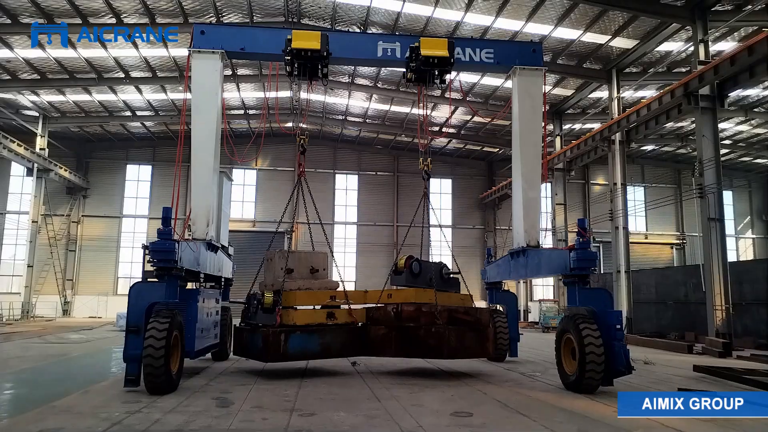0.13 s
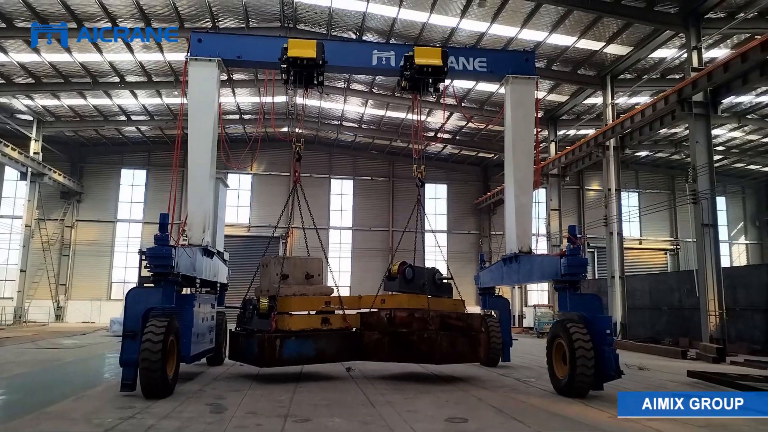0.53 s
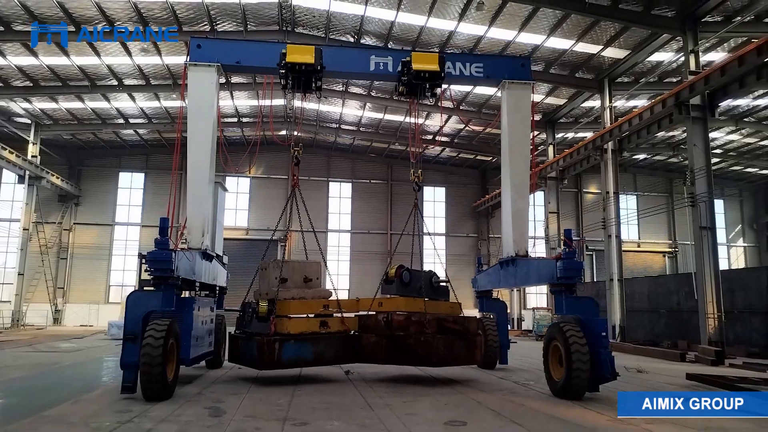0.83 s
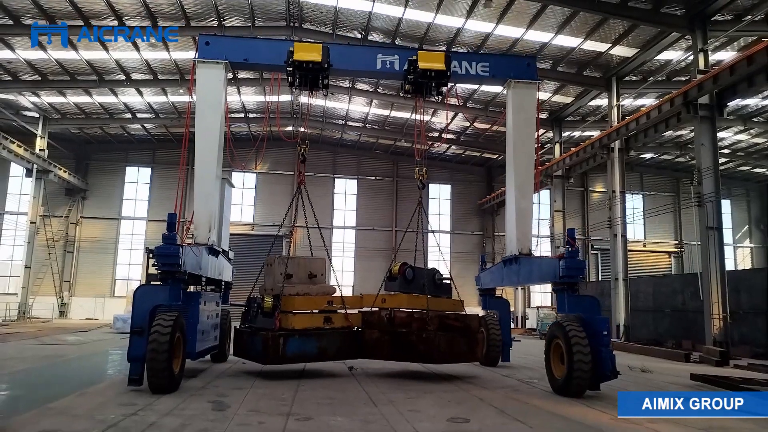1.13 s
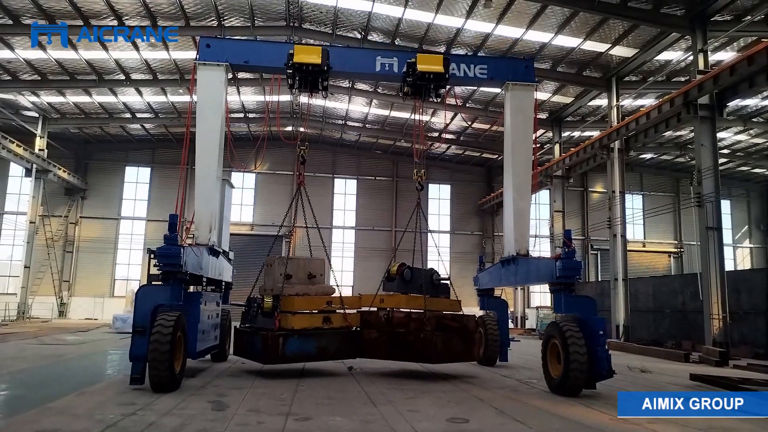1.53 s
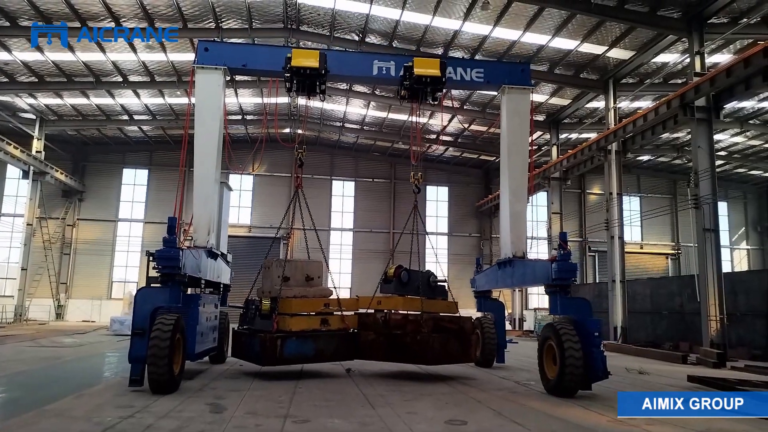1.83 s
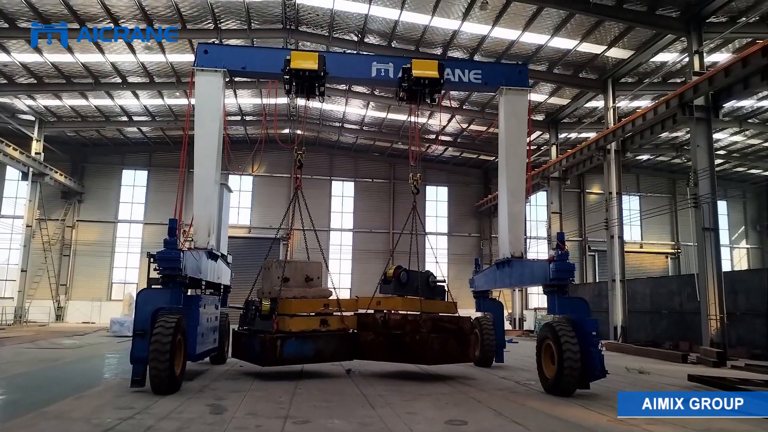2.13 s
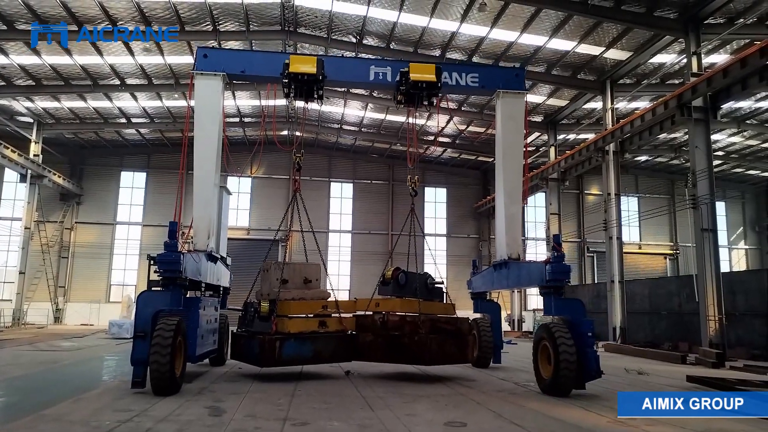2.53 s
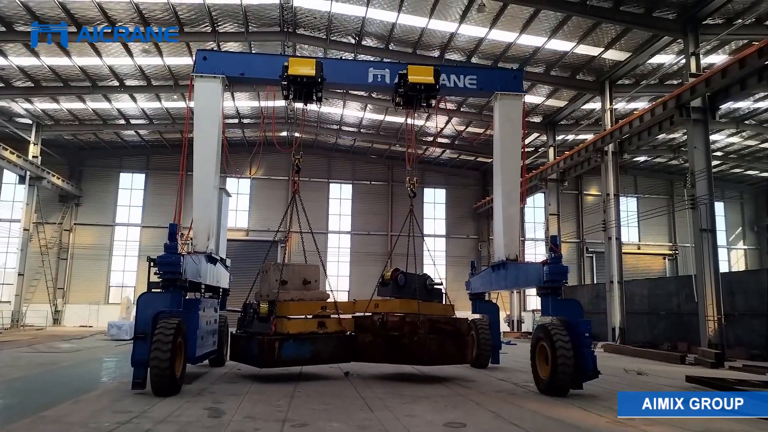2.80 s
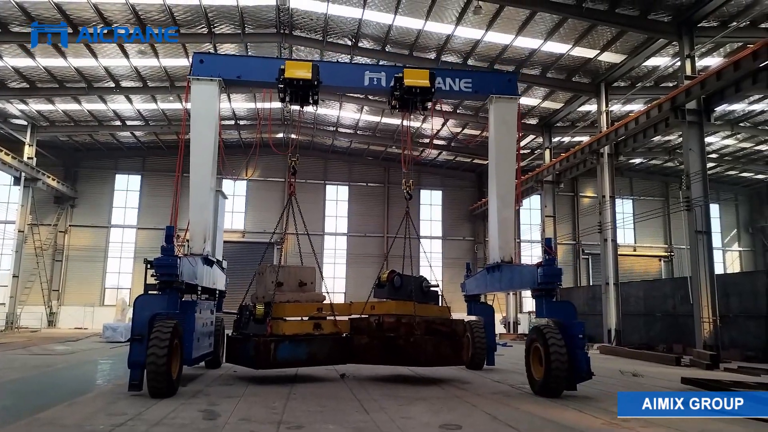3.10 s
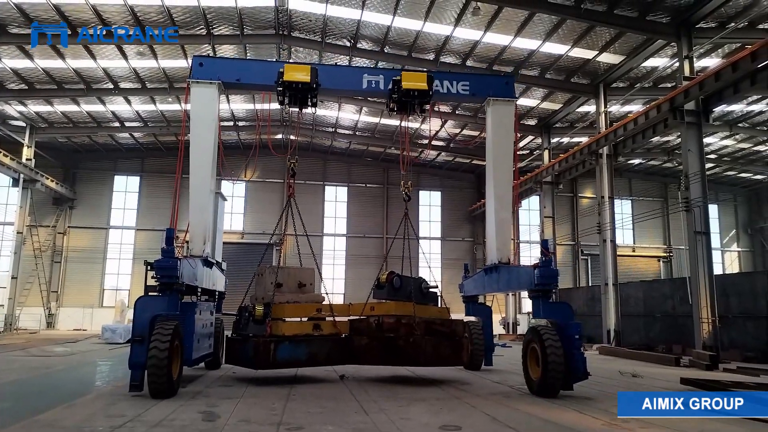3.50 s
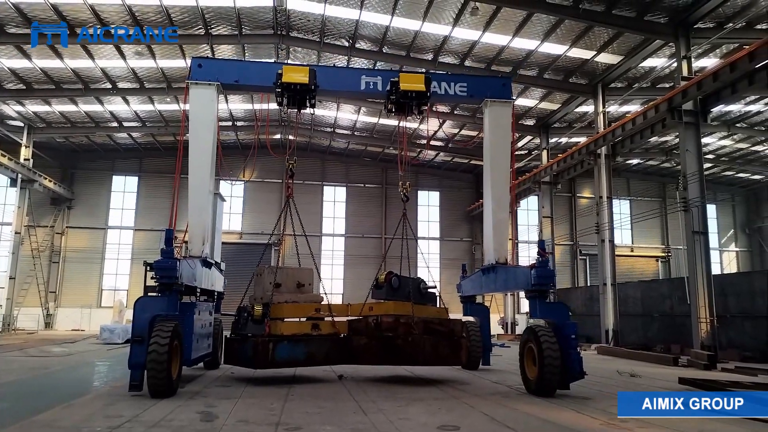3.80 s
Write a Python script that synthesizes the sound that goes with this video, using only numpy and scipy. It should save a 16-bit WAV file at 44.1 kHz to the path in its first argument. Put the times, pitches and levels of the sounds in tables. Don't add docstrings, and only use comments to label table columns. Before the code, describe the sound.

A wheeled gantry crane's diesel engine drones steadily in a large factory hall, with a swelling low hum, broad roar and thin high whine; faint metallic knocks come late; phone microphone in stereo.

```python
import sys
import numpy as np
from scipy import signal
from scipy.fft import rfft, irfft
from scipy.io import wavfile
from scipy.ndimage import uniform_filter1d

SR = 44100
rng = np.random.default_rng(int(sys.argv[2]) if len(sys.argv) > 2 else 0)


def store_wav(level_fs):
    pcm = np.round(np.clip(np.atleast_2d(level_fs), -1, 1) * 32767)
    wavfile.write(sys.argv[1], SR, pcm.T.astype(np.int16))


def how_loud(loudness_db):
    steps = np.asarray(loudness_db, float) / 20
    return 10 ** steps


N = 174195
START_S = 0.11


def evened(x):
    return x / np.sqrt(np.mean(abs(x) ** 2) + 1e-20)


def read(points, hz):
    f, value = np.transpose(points)
    return np.interp(np.log(hz + 1), np.log(f + 1), value)


def drift(top_hz):
    t = np.arange(0, N + 64, 64) / SR
    slow = 0
    for f in np.geomspace(.3, top_hz, num=12):
        slow = slow + np.sin(2 * np.pi * (f * t + rng.random())) / np.sqrt(f)
    return np.interp(np.arange(N) / SR, t, evened(slow))


def fuzz(hz, width_hz):
    r = np.exp(-np.pi * width_hz / SR)
    noise = rng.standard_normal(N) + 1j * rng.standard_normal(N)
    slow = signal.lfilter([1], [1, -2 * r, r * r], noise)
    carrier = np.exp(2j * np.pi * hz * np.arange(N) / SR)
    return evened((slow * carrier).real)


def wash(spectrum, swell_db, patch_db, flicker_db):
    frames = N // 256 + 5
    a, b, c, d, patches = rng.standard_normal((frames, 513, 5)).T
    patches = uniform_filter1d(patches, size=14, axis=0)
    patches = evened(uniform_filter1d(patches, size=16, axis=1))
    swell = drift(2.1)[np.minimum(np.arange(frames) * 256, N - 1)]
    flicker = evened(uniform_filter1d(rng.standard_normal(frames), size=3))
    level_db = patch_db * patches + swell_db * swell + flicker_db * flicker
    z = np.array([a + 1j * b, c + 1j * d]) * how_loud(level_db)
    x = signal.istft(z, nperseg=1024, noverlap=768)[1][:, :N]
    colour = how_loud(read(spectrum, np.fft.rfftfreq(N, 1 / SR)))
    return evened(irfft(rfft(x) * colour, N))


def casing_rumble():
    # (frequency [Hz], density [dB per Hz])
    rumble_colour = [(20, -57.5), (55, -40.5), (85, -10), (125, -1.5), (185, -7), (220, -7), (260, -11.5),
                     (400, -34.5)]
    return how_loud(-26) * wash(rumble_colour, 0.91, 1., 1.0)


def machinery_roar():
    # (frequency [Hz], density [dB per Hz])
    roar_colour = [(150, -8.5), (400, -1), (900, -3), (2000, -5), (2600, -8), (4800, -16.5), (6200, -12.5),
                   (16000, -17)]
    return how_loud(-19.5) * wash(roar_colour, 0.16, 0.93, 0.65)


def knocks():
    # (time [s], level [dB])
    blows = [
        (2.371, -36),
        (2.559, -36.5),
        (2.834, -29),
    ]
    # (frequency [Hz], level [dB], time to fall 60 dB [s])
    metal_modes = [(5290, 0, .3), (5750, -5, .2), (6700, -6, .2), (8500, 2, .45), (9800, -2, .3),
                   (11100, -4, .3), (13100, 3, .7)]
    rings = [(fuzz(hz, 90.), db, t60) for hz, db, t60 in metal_modes]
    puff_band = signal.butter(2, (4400, 12400), "band", fs=SR, output="sos")
    puff = evened(signal.sosfilt(puff_band, rng.standard_normal(N)))
    rings.append((puff, 8, .5))
    out = 0
    for start_s, blow_db in blows:
        t = np.maximum(np.arange(N) / SR - start_s, 0)
        rise = np.minimum(t / 0.006, 1)
        out = out + rise * sum(how_loud(blow_db + db - 60 * t / t60) * ring for ring, db, t60 in rings)
    return out


def humps_and_whine():
    # (frequency [Hz], width [Hz], level [dB rms])
    roar_humps = [(1165, 320, -27), (1913, 220, -31.5), (5710, 570, -43.5), (440.4, 51, -39.5)]
    # (frequency [Hz]), (width [Hz]), (level [dB rms]), (drift [dB per s])
    whine_hz = (5695, 5986, 6346, 6716)
    whine_width_hz = (24, 30, 45, 70)
    whine_db = (-41, -42, -48, -46)
    whine_db_per_s = (-.9, 0, 1.6, 0)
    peaks = [tuple(row) + (0,) for row in roar_humps]
    peaks += list(zip(whine_hz, whine_width_hz, whine_db, whine_db_per_s))
    t = np.arange(N) / SR
    return sum(how_loud(db + slope * t + 1.8 * drift(4.7)) * fuzz(hz, width_hz)
               for hz, width_hz, db, slope in peaks)


def pump():
    # (time [s], fundamental [dB], second [dB], third [dB])
    standing_waves = [(0, -25, -28, -32), (.5, -21.5, -31, -32), (.8, -19, -31, -33),
                      (1.1, -22.5, -31.5, -27), (1.4, -29.5, -33, -32.5), (1.7, -26.5, -25, -33),
                      (2, -17.5, -36.5, -28), (2.3, -22.5, -26, -31), (2.6, -19.5, -32.5, -32),
                      (2.9, -19.5, -28.5, -34), (3.2, -21.5, -27.5, -29.5), (3.45, -19, -31, -32),
                      (3.7, -20, -28.5, -36), (3.95, -21, -36, -36)]
    # (multiple of the pump frequency [1], level [dB rms], fuzz width [Hz])
    faint_tones = [(4, -41, 14.), (.524, -37, 3.)]
    pump_hz, peak_s = 201.44, .4002
    t = np.arange(N) / SR
    turns = pump_hz * (t - peak_s) + 0.02 * drift(4.)
    times, *harmonics_db = np.transpose(standing_waves)
    hum = 0
    for k, db in enumerate(harmonics_db, 1):
        clean = np.sqrt(2) * np.cos(2 * np.pi * k * turns)
        hum = hum + how_loud(np.interp(t, times, db)) * (clean + .4 * fuzz(k * pump_hz, 14))
    return hum + sum(how_loud(db) * fuzz(k * pump_hz, width_hz) for k, db, width_hz in faint_tones)


def engine():
    # (multiple of the cycle [1], level [dB rms], drift [dB per s])
    pulse_orders = [(6, -30.5, 0.5), (9, -20, -1), (12, -20, -1.5), (13, -32, -2.5), (14, -29, -0.5)]
    # (multiple of the cycle [1], level [dB rms])
    uneven_orders = [(5, -51), (7, -47.5), (8, -49), (10, -39), (15, -30.5), (20, -43), (22, -44),
                     (24, -35), (25, -43), (34, -43.5), (36, -60.5)]
    cycle_hz, firing_s = 12.555, .4302
    pipe_lag = .044
    t = np.arange(N) / SR - firing_s

    def order(k, turn):
        return np.sqrt(2) * np.cos(2 * np.pi * (k * cycle_hz * t + turn))

    out = 0
    for k, db, slope in pulse_orders:
        out = out + how_loud(db + slope * t + 1.6 * drift(8)) * order(k, -pipe_lag * max(k - 9, 0))
    for k, db in uneven_orders:
        out = out + how_loud(db + 1.73 * drift(3.14)) * order(k, rng.random())
    return out


def fade(seconds):
    t = np.arange(N) / SR - START_S
    return (t > 0) * how_loud(-17 * np.exp(-np.maximum(t, 0) * 2 / seconds))


def two_ports(tones, diffuse):
    # (frequency [Hz], gain [dB])
    left_colour = [(700, 1.03), (1200, 0), (4500, -3), (5800, -3.5), (6800, 1.5), (8400, -2), (9900, -14),
                   (13000, -24)]
    right_colour = [(700, 0.94), (1200, 1.5), (4500, 1.5), (5800, 5.5), (6800, 2.5), (7550, -14.5),
                    (8800, -15.5), (13000, -29)]
    # (frequency [Hz], coherence [0-1])
    likeness = [(40, .85), (110, .975), (280, .8), (520, .56), (850, .45), (1200, .7), (1950, .42),
                (2900, .2)]
    # (frequency [Hz], phase [radians])
    left_lead = [(200, .09), (600, .45), (1000, 1.2), (1400, 3.1), (1700, 7.9), (2150, 9.3), (2760, 17),
                 (5000, 20)]
    hz = np.fft.rfftfreq(N, 1 / SR)
    tones = rfft(tones)
    a, b = rfft(diffuse)
    same = np.clip(read(likeness, hz), 0, 1)
    left_bass_db = 1.8 / (1 + (hz / 90) ** 2)
    left = (tones + a) * how_loud(read(left_colour, hz) + left_bass_db)
    right = tones + same * a + np.sqrt(1 - same ** 2) * b
    right = right * np.exp(-1j * read(left_lead, hz)) * how_loud(read(right_colour, hz))
    return irfft([left, right], N)


def scene():
    low = casing_rumble()
    high = machinery_roar()
    high += [humps_and_whine() + knocks() for _ in "LR"]
    bass_fade = fade(.2)
    diffuse = low * bass_fade + high * fade(0.057)
    tones = (engine() + pump()) * bass_fade
    return two_ports(tones, diffuse) * (np.arange(N) / SR > START_S)


def round_peaks(x):
    knee, ceiling = .5, .83
    over, room = np.maximum(abs(x) - knee, 0), ceiling - knee
    return x - np.sign(x) * (over - room * np.tanh(over / room))


def drop_faint_treble(x):
    bar_db, jitter_db = np.reshape([[-60, -54], [3.5, .6]], (2, 2, 1, 1, 1))
    hz, _, z = signal.stft(x, SR, nperseg=2048, noverlap=1536)
    bands = z[:, :1024].reshape(2, 128, 8, -1)
    band_power = uniform_filter1d((abs(bands) ** 2).sum(2, keepdims=True), size=2, axis=3)
    chance = uniform_filter1d(rng.standard_normal(band_power.shape), size=5, axis=3)
    chance = evened(uniform_filter1d(chance, size=2, axis=1))
    loud_enough = band_power > how_loud(2 * (bar_db + jitter_db * chance))
    below_treble = (hz[:1024:8] < 7450)[:, None, None]
    z[:, :1024] = (bands * (loud_enough | below_treble)).reshape(2, 1024, -1)
    return signal.istft(z, SR, nperseg=2048, noverlap=1536)[1][:, :N]


def treble_haze():
    band = signal.butter(6, (13300, 15100), "band", fs=SR, output="sos")
    haze = evened(signal.sosfilt(band, rng.standard_normal((2, N))))
    return how_loud([-96, -84])[:, None] * haze * how_loud(3 * drift(20.))


def top_cut(x):
    return signal.sosfilt(signal.butter(12, 15150, fs=SR, output="sos"), x)


def record(dry):
    dry = signal.sosfilt(signal.butter(2, 38, "high", fs=SR, output="sos"), dry)
    kept = drop_faint_treble(round_peaks(dry)) + treble_haze()
    mix = kept * (np.arange(N) / SR > START_S - .01)
    return top_cut(mix)


dry = scene()
out = record(dry)
store_wav(out)
```